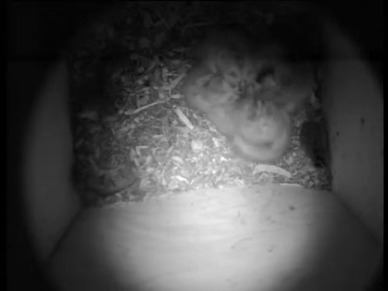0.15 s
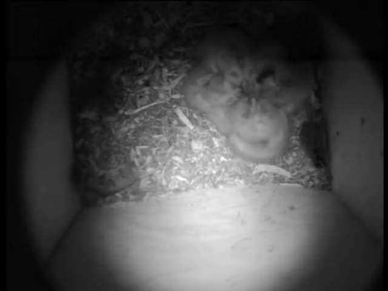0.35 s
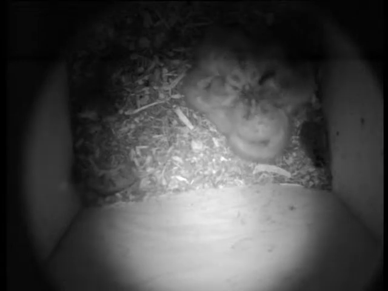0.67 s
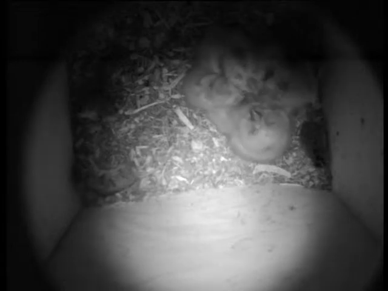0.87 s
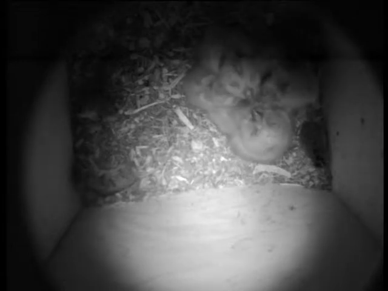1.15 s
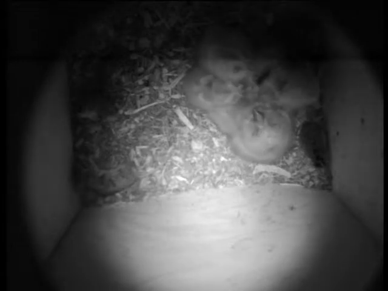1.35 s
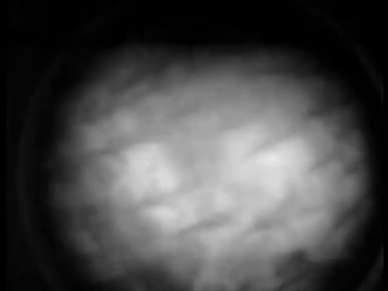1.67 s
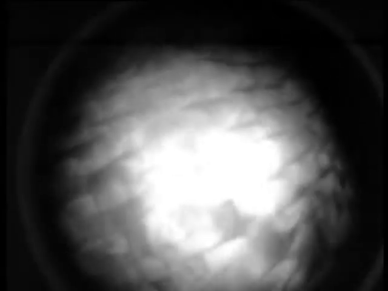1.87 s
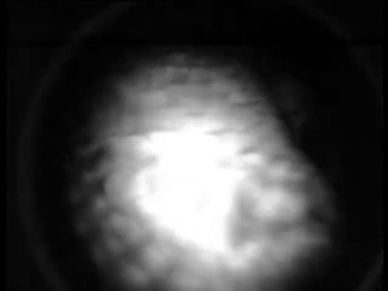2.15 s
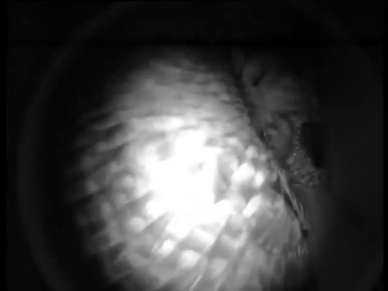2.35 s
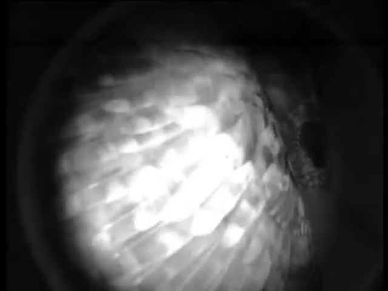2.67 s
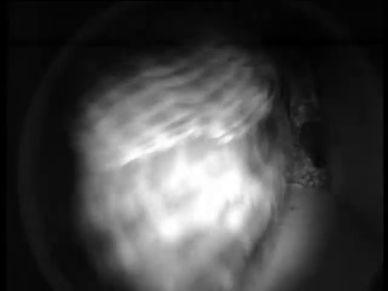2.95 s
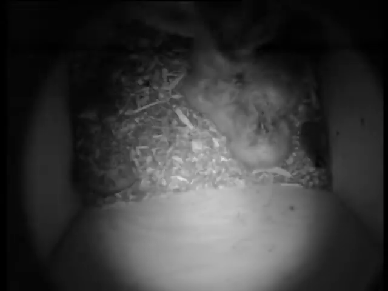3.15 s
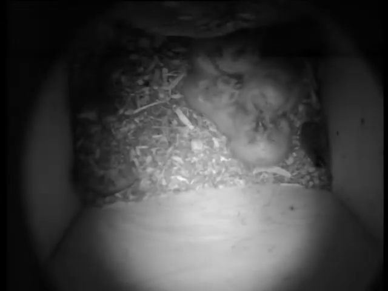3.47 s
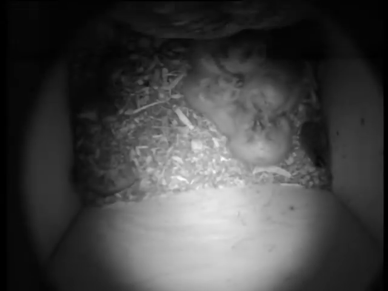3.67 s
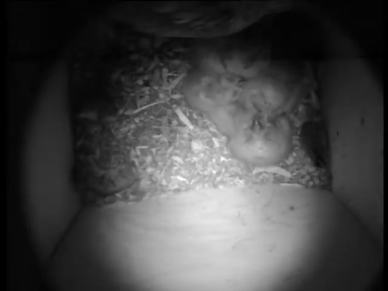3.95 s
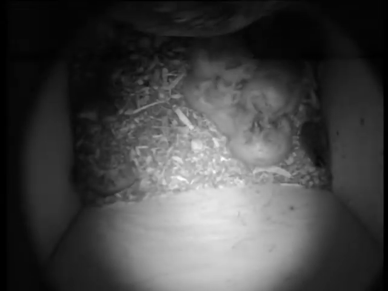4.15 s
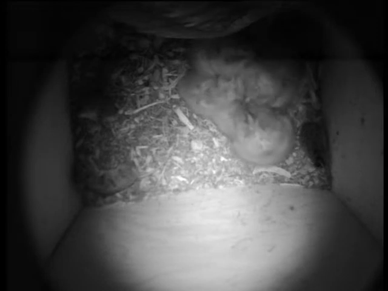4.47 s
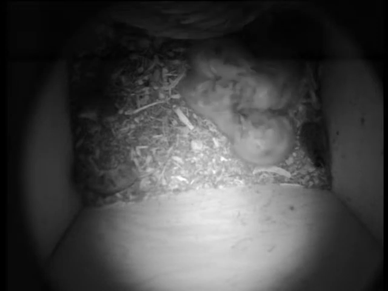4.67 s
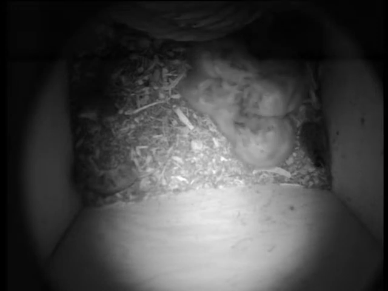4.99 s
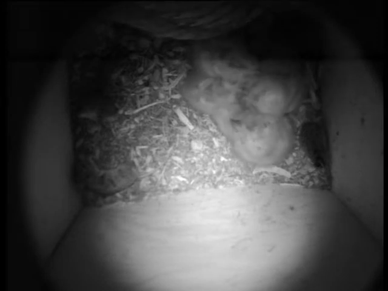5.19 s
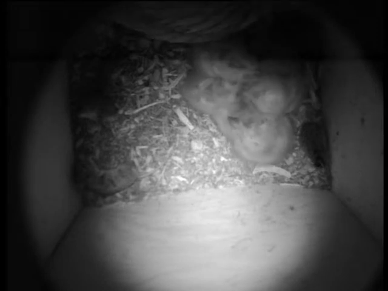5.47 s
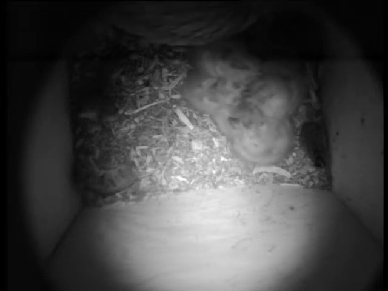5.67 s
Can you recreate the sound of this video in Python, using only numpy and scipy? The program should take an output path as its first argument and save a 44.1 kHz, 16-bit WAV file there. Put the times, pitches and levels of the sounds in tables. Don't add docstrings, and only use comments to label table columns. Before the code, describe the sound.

Close, boxy and left-sided: a low electrical buzz with a thin high whine runs throughout. Dull thumps lead to an owl chick's short hoarse hiss, then scattered claw knocks and scratches. A hard, clipped burst of banging follows, with ringing wood, low coos, another hiss and brushing feathers. It settles, broken by a final squeaky rasp and a soft thump.

```python
import sys
import numpy as np
from scipy import signal
from scipy.fft import rfft, irfft
from scipy.io import wavfile
from scipy.ndimage import uniform_filter1d

SR = 44100
rng = np.random.default_rng(int(sys.argv[2]) if len(sys.argv) > 2 else 0)


def dump_mix(stems):
    frames = np.atleast_2d(stems).T
    limited = np.clip(frames, -1, 1)
    pcm = np.round(limited * 32767).astype(np.int16)
    wavfile.write(sys.argv[1], SR, pcm)


def voltage_ratio(decibels):
    exponent = np.asarray(decibels, float) / 20
    return 10 ** exponent


N = 256662


def rms_one(x):
    return x / np.sqrt(np.mean(x ** 2) + 1e-20)


def in_time(rows):
    s, *columns = np.transpose(rows)
    return [np.interp(np.arange(N) / SR, s, column) for column in columns]


def sounding(tables, fade_s):
    t, gate = np.arange(N) / SR, 0
    for rows in tables:
        gate = np.maximum(gate, (t >= rows[0][0]) & (t <= rows[-1][0]))
    gate = uniform_filter1d(gate * 1., size=max(int(fade_s * SR), 1))
    return gate, *in_time(sum(map(list, tables), []))


def coloured(x, spectrum):
    hz, db = np.transpose(spectrum)
    f = np.arange(1, N // 2 + 2) * SR / N
    return rms_one(irfft(rfft(x) * voltage_ratio(np.interp(np.log(f), np.log(hz), db)), N))


def drift(hz):
    return rms_one(signal.sosfilt(signal.butter(2, hz, fs=SR, output="sos"), rng.standard_normal(N)))


def band(x, low_hz, high_hz):
    return signal.sosfilt(signal.butter(2, [low_hz, high_hz], "band", fs=SR, output="sos"), x)


def low(x, hz):
    return signal.sosfilt(signal.ellip(7, .3, 80, hz, fs=SR, output="sos"), x)


def grains(per_s, spread_db):
    sizes = voltage_ratio(spread_db * np.minimum(rng.exponential(1, N), 4)) * rng.choice([-1, 1], N)
    return sizes * (rng.random(N) < per_s / SR)


def ring(force, hz, t60):
    r, w = voltage_ratio(-60 / (t60 * SR)), 2 * np.pi * hz / SR
    return signal.lfilter([0, np.sin(w)], [1, -2 * r * np.cos(w), r * r], force + 1e-18)


def struck(times, level_db, contacts, modes, scatter_db):
    out, luck = 0, rng.standard_normal((len(times), len(modes)))
    steps = np.arange(contacts.shape[1])
    at = (np.array(times) * SR).astype(int)[:, None] + steps
    for (hz, db, t60), chance in zip(modes, luck.T):
        drive = np.maximum(np.abs(contacts @ np.exp(2j * np.pi * hz * steps / SR)), .25)
        gain = voltage_ratio(level_db + db + scatter_db * chance) / drive
        force = np.zeros(N)
        np.add.at(force, at, contacts * gain[:, None])
        out = ring(force, hz, t60) - out
    return out


def floor_echo(x):
    lag = int(1.363 * SR / 1000)
    return (x + voltage_ratio(-11) * np.roll(x, lag)) * voltage_ratio(-1)


def nest_box(x, more_db=0):
    out = x.copy()
    for ms, db in [(1.3, -36.0), (2.1, -13.0), (3.4, -15.0), (5.3, -24.5), (7.9, -7.0), (11.7, -17.0)]:
        lag = int(ms * SR / 1000)
        out[lag:] += voltage_ratio(db + more_db) * x[:-lag]
    return out


# (start [s], length [s], breath [dB], push [dB], peak of the push [share of call])
BEGGING = [
    (0.658, 0.27, -46.5, 3.5, 0.61),
    (2.352, 0.32, -53.5, 7, 0.65),
    (4.174, 0.31, -51.5, 11.5, 0.72),
]
# (brightness at ease [dB], brightness when pushing [dB])
BRIGHTNESS = [
    (10.5, 4.5),
    (9, 10.5),
    (4, -5.5),
]


def breath():
    attack_s, release_s, sag_db_per_s, push_width = 0.02, 0.049, -29.5, 0.24
    t, calls = np.arange(N) / SR, []
    for (s, length, db, push_db, push_at), (ease_db, pushed_db) in zip(BEGGING, BRIGHTNESS):
        edge = np.clip((t - s) / attack_s, 0, 1) * np.clip((s + length - t) / release_s, 0, 1)
        push = np.exp(-(((t - s) / length - push_at) / push_width) ** 2)
        pressure_db = db + push_db * push + sag_db_per_s * np.clip(t - s, 0, length)
        calls.append((edge * voltage_ratio(pressure_db), ease_db + (pushed_db - ease_db) * push))
    return calls


# (frequency [Hz], level per Hz [dB])
BREATH_SPECTRUM = [(240, -55), (400, -14), (829, -4.5), (1330, -3), (1500, 1.5), (2210, 0), (2570, 5),
                   (4800, 4.5), (7610, -2.5), (14000, -22.5)]
# (frequency [Hz], width [Hz], level [dB])
THROATS = [
    [(805, 520, 5.5), (1530, 44, -31), (1806, 44, 8), (2490, 250, 1.5), (2800, 230, -10.5), (3130, 150, 5),
     (4450, 290, -8), (4950, 270, -17), (5880, 79, -2.5), (6500, 100, -7), (7600, 100, -9), (8100, 70, -11),
     (9900, 150, 0.5), (11380, 110, 5)],
    [(900, 320, 3.5), (1930, 72, 2.5), (2700, 200, -24), (3670, 82, -4), (4480, 260, -7), (5160, 80, -8),
     (5800, 190, -4.5), (6570, 140, -6), (7460, 130, -4), (7700, 70, -1), (8590, 73, -6), (9100, 120, -4),
     (10300, 79, -23)],
    [(837, 420, 4.5), (1480, 54, -4), (1740, 37, 4.5), (2650, 92, -6), (3230, 87, -2.5), (3770, 210, -17),
     (4520, 130, -7), (5170, 140, -3), (6000, 82, 0), (6500, 110, -6), (6550, 70, -5), (7500, 120, 5.5),
     (8100, 106, -1), (8700, 150, -7)],
]


def hiss():
    air = coloured(rng.standard_normal(N), BREATH_SPECTRUM) * voltage_ratio(3 * drift(250))
    out = 0
    for (gain, bright_db), throat in zip(breath(), THROATS):
        voiced = voltage_ratio(-11.5) * air
        for hz, width, peak_db in throat:
            resonance = signal.iirpeak(hz, hz / max(width, 20), fs=SR)
            voiced = voiced + voltage_ratio(peak_db + 0.5) * signal.lfilter(*resonance, air)
        voiced = voiced / np.std(band(voiced, 1040, 2720))
        out = out + gain * (voiced + (voltage_ratio(bright_db) - 1) * band(voiced, 6330, 20000))
    return out


def syrinx(tables, hoarseness, octave_db, flutter_hz):
    rows_with_noise = [[(*row, share) for row in rows] for rows, share in zip(tables, hoarseness)]
    gate, hz, db, hoarse = sounding(rows_with_noise, 0.0031)
    hoarse = np.clip(hoarse + 0.012 * np.maximum(-38 - db, 0), 0, 1)
    noise = drift(flutter_hz) + 1j * drift(flutter_hz)
    swing = np.sqrt(1 - hoarse) + np.sqrt(hoarse / 2) * noise
    tone = swing * np.exp(2j * np.pi * np.cumsum(uniform_filter1d(hz, size=400)) / SR)
    db = uniform_filter1d(db, size=150)
    octave = voltage_ratio(octave_db + db / 2) * (1 - hoarse) ** 4 * (tone ** 2).real * (hz < 7300)
    return gate * np.sqrt(2) * (voltage_ratio(db) * tone.real + octave)


def notes(rows):
    return [[(s, hz0, db - 6), (s + length / 2, (hz0 + hz1) / 2, db), (s + length, hz1, db - 6)]
            for s, length, hz0, hz1, db in rows]


# (time [s], frequency [Hz], level [dB])
HIGH_SQUEAKS = [
    [(0.66, 7000, -46.5), (0.685, 6900, -47), (0.73, 8030, -55), (0.76, 7000, -52), (0.805, 6900, -45),
     (0.815, 6630, -40), (0.834, 6180, -36), (0.863, 6550, -41.5), (0.885, 6740, -73)],
    [(2.365, 6300, -39), (2.39, 7740, -73), (2.515, 7650, -57), (2.535, 7330, -31), (2.556, 6880, -39),
     (2.588, 6220, -27.5), (2.6, 5450, -39.5), (2.612, 3790, -32), (2.622, 3580, -56)],
    [(4.178, 4060, -51.5), (4.19, 6820, -39), (4.212, 8100, -65), (4.305, 8000, -55), (4.34, 7350, -40),
     (4.374, 5700, -32.5), (4.408, 7240, -36), (4.433, 7500, -38), (4.461, 3660, -46.5)],
]
HIGH_HOARSE = [.08, .2, .45]
# (start [s], length [s], from [Hz], to [Hz], level [dB])
LOW_SQUEAKS = [
    (0.652, 0.0089, 4730, 4880, -41),
    (0.661, 0.018, 4820, 5130, -46),
    (0.79, 0.083, 4520, 4270, -47),
    (0.855, 0.041, 4320, 4586, -41),
    (0.89, 0.013, 4480, 4050, -34.5),
    (2.51, 0.0754, 4750, 4450, -43),
    (2.58, 0.024, 4450, 4480, -37.5),
]
LOW_HOARSE = [.3, .1, .4, .05, .02, .6, .5]


def squeaks():
    return syrinx(HIGH_SQUEAKS, HIGH_HOARSE, -40, 390) + syrinx(notes(LOW_SQUEAKS), LOW_HOARSE, -40, 390)


# (time [s], peak [dB], hollow ring [dB], bright crack [dB], dull crack [dB])
TAPS = [(0.9496, -43.5, -5, 1, 7), (0.971, -48, -2, 8, -15), (1.114, -31, -5, 0, -1),
        (1.1725, -36.5, 2, 4, -2.5), (1.3599, -36.5, -1, -5, 2.5), (1.4158, -26.5, -12, -7, -8),
        (1.4581, -29, 1, -5, 0), (1.4737, -35.5, 5, -14, 9), (1.6563, -16.5, -17, 0, 5),
        (1.6594, -20, 15.5, 6.5, 10.5), (1.676, -25, 7, -6, -16.5), (1.6869, -28, 13, 0, 3.5),
        (1.697, -27.5, 9, -5, 1.5), (1.709, -22, 10.5, -9, 0), (1.7201, -10, 1, -13.5, -9.5),
        (1.7346, -42.5, 9, -3, 15.5), (1.7514, -21.5, 5.5, -11, -22), (1.7793, -31.5, -11, -12, -12),
        (1.7988, -34, 3, -17, -8), (1.8042, -12, -8, -7, -15), (1.8662, -36.5, -3, -24, 7.5),
        (1.9, -41, -11, -4, 3), (1.9684, -23, -11, -24, -2), (1.996, -26.5, -13, -8, 2.5),
        (2.0082, -21.5, -4, -14, -0.5), (2.042, -27, -5, -20, -4.5), (2.047, -32, -3, -2, 0),
        (2.0572, -28.5, -22, 1.5, 1), (2.0793, -26, -3, -12.5, 5), (2.3268, -24, -15, -3, -8)]
# (time [s], peak [dB], hollow ring [dB], bright crack [dB])
SKIDS = [(0.936, -43, -21, -21), (1.1408, -45, 12.5, -19), (1.1577, -33, -4, -12), (1.2343, -41.5, -3, -21),
         (1.255, -51, -10, 6), (1.3078, -33.5, -8, -7), (1.377, -37, 2.5, -2), (1.4367, -20, -10, 3),
         (1.445, -17, -17, -18), (1.4855, -31, -11, -8), (1.4914, -57, -5, 16), (1.642, -15.5, -10, -2.5),
         (1.6513, -11.5, -2, -5.5), (1.6688, -9, -2, -1), (2.0326, -21.5, -23, -7), (2.0665, -47, -10, 11),
         (2.095, -38, -9, 10.5), (2.104, -22, -23, -2), (2.1138, -17, -11, -8), (2.118, -15.5, -16, -0.5),
         (2.125, -28.5, -5, -24), (2.164, -16.5, -11, 3.5), (2.169, -21.5, -7, -5), (2.193, -27.5, -5, -5),
         (2.3404, -29.5, -14, 7), (2.621, -53, 11, -5), (2.6447, -41.5, -3, 2), (2.6543, -41, -1, -4),
         (2.678, -50.5, 11, 4), (2.696, -51, -7, 16), (2.741, -55.5, -23, 17), (3.274, -60.5, 11.5, -10)]
# (frequency [Hz], level [dB], t60 [s])
NEAR_HOLLOW = [(610, -22, .03), (700, -18, .035), (860, -17, .035), (985, 0, .045), (1040, -17, .03),
               (1180, -15, .03), (1300, -16, .025), (1450, -18, .025)]
# (frequency [Hz], level [dB], t60 [s])
FAR_HOLLOW = [(600, -1, 0.016), (707, 2, 0.023), (840, -2.5, 0.022), (1015, -3, 0.034),
              (1170, -11.5, 0.034), (1366, -7, 0.017)]
# (frequency [Hz], level [dB], t60 [s])
WALL = [(1870, -17, .035), (2300, -18, .03), (2540, -21, .03), (2870, -16, .02), (3090, -14, .025),
        (3200, -1.5, .04), (3350, -17, .02), (3880, -15, .02), (4040, -13, .02), (4500, -19, .02)]
# (frequency [Hz], level [dB], t60 [s])
GRAIN = [(5500, -3.5, 0.026), (5774, -5.5, 0.012), (6500, 3.5, 0.0035), (7700, -4, .01),
         (8620, -1.5, 0.0081), (9800, -21, 0.012)]


def claws():
    s, db, hollow_db, bright_db, dull_db = np.transpose(TAPS + [(*row, 0) for row in SKIDS])
    tapped = np.arange(len(s)) < len(TAPS)
    over_microphone = (s >= 1.6) & (s <= 1.96)
    ring_db = np.where(tapped, -0.5, -15) - 8 * ~over_microphone

    ms = np.where(tapped, 2.6, 4.0) * voltage_ratio(1.5 * rng.standard_normal(len(s)))
    length = np.clip(ms, .2, 9)[:, None] / 1000
    steps = np.arange(1500)
    t = steps / SR
    grate = rng.standard_normal((len(s), 1500)) * (1 - np.exp(-t / (0.69 * length))) * np.exp(-t / length)
    grate /= np.sqrt(np.sum(grate ** 2, axis=1, keepdims=True))

    at = (s * SR).astype(int)[:, None] + steps
    dull, bright = np.zeros((2, N))
    np.add.at(dull, at, grate * voltage_ratio(db + dull_db)[:, None])
    np.add.at(bright, at, grate * voltage_ratio(db + bright_db)[:, None])
    crack = voltage_ratio(22.0) * band(dull, 380, 3150) + voltage_ratio(10.5) * band(bright, 2400, 12500)

    tap = .4 * grate + .8 * (steps == 20)
    soft = uniform_filter1d(tap, size=16)
    near = tapped & (s > 1.6) & (s < 1.96)
    hollow = struck(s[near], (db + hollow_db)[near], soft[near], NEAR_HOLLOW, 1.5)
    hollow = hollow + struck(s[~near], (db + hollow_db)[~near], soft[~near], FAR_HOLLOW, 3.7)
    wall = struck(s, db + ring_db, tap, WALL, 2)
    wall = wall + struck(s, db + bright_db + ring_db - 2, grate, GRAIN, 3)
    return band(hollow, 360, 2700) + band(wall, 1130, 11000) + nest_box(crack)


# (time [s], frequency [Hz], level [dB])
SNAPS = [(0.973, 3020, -35), (0.974, 6500, -46), (1.115, 7600, -38), (1.116, 6060, -31), (1.115, 2957, -35),
         (1.117, 9900, -48), (1.174, 5440, -25.5), (1.175, 9900, -44.5), (1.177, 3670, -36.5),
         (1.235, 2800, -43), (1.309, 4600, -30), (1.309, 9220, -44), (1.361, 3000, -36), (1.378, 2900, -44),
         (1.361, 6180, -38), (1.416, 5870, -30), (1.416, 3350, -39), (1.416, 7780, -42), (1.446, 5800, -26),
         (1.458, 9140, -37), (1.474, 2640, -31), (1.804, 9200, -31), (1.999, 6000, -43),
         (2.047, 7700, -38.5), (2.057, 6100, -35), (1.447, 2740, -22.5), (1.67, 5890, -32),
         (2.096, 8120, -32), (2.104, 8120, -26), (2.121, 4550, -29), (2.165, 4610, -26),
         (2.166, 7700, -28.5)]


def snaps():
    out, t60, pair = 0, 0.016, 1.07
    for s, hz, db in SNAPS:
        grit = rng.standard_normal((1, 400)) * np.exp(-np.arange(400) / (0.003 * SR)) / 6
        modes = [(hz, 0, t60), (hz * pair, -2, t60 / 2), (hz / pair ** 2, -5, t60 / 2)]
        out = out + struck([s], np.array([db]), grit, modes, 0)
    return out


# (time [s], peak [dB], panel over boom [dB])
THUDS = [(0.108, -22, -23), (0.169, -29, -33), (0.544, -24.5, -42), (0.818, -11, -27.5), (1.097, -21, -32),
         (1.171, -13, -32), (1.44, -14, -11.5), (1.473, -15.5, -15.5), (1.64, -7, -12.5), (1.966, -38, 15),
         (1.984, -34, 10.5), (2.01, -25.5, 3.5), (2.059, -22, -15), (2.113, -6.5, -21), (2.164, -11, -13),
         (2.325, -20, -3.5), (2.345, -23.5, -1.5), (2.362, -29, -5), (3.082, -43, 3), (3.26, -35.5, -6.5),
         (4.464, -23, -31.5)]
# (frequency [Hz], level [dB], t60 [s])
BOOM = [(76.6, -16.5, 0.42), (100, -2, 0.1)]
# (frequency [Hz], level [dB], t60 [s])
PANEL = [(185, -17, 0.14), (273, -9, 0.19), (303, -7.5, 0.091), (319.7, -7, 0.19), (442, -17.5, 0.13)]


def thuds():
    s, db, panel_db = np.transpose(THUDS)
    push = np.hanning(70)[None] / 35 * np.ones((len(s), 1))
    boom = struck(s + 0.0015, db - 11.5, push, BOOM, 1.0)
    return boom + struck(s + 0.0035, db + panel_db, push, PANEL, 3.2)


# (time [s], frequency [Hz], level [dB], t60 [s])
KNOCKS = [(0.0505, 99.6, -13, 0.088), (0.0515, 269.6, -23, 0.14), (0.051, 337, -28.5, 0.11),
          (0.053, 80, -34, 0.45), (1.649, 324, -13, 0.026), (1.651, 520, -9, 0.017),
          (1.808, 3230, -18.5, 0.047), (2.022, 3130, -36, .03), (2.05, 3210, -28, .04),
          (2.058, 3120, -31, .03), (2.066, 110, -24, .08), (2.108, 3200, -42, .03), (2.113, 3270, -32, .02),
          (2.123, 100, -22, 0.083), (2.151, 3180, -35, 0.022), (2.172, 3190, -26, 0.042),
          (2.195, 3200, -42, .03), (1.487, 60, -26.5, .1), (3.385, 90, -50, .08), (2.614, 331, -39.5, 0.21),
          (2.644, 325, -33, 0.058), (2.65, 325, -48, 0.029), (2.654, 600, -34.5, 0.039),
          (2.654, 330, -35.5, 0.12), (2.692, 900, -40, 0.047), (2.74, 312, -48, .08),
          (2.783, 319, -35.5, 0.034), (2.868, 320, -40, 0.058), (2.912, 320, -41, .05),
          (2.975, 320, -45.5, 0.07)]


def knocks():
    out = 0
    for s, hz, db, t60 in KNOCKS:
        push = np.hanning(3 + int(SR / hz / 3))[None]
        out = out + struck([s], np.array([db]), push, [(hz, 0, t60)], 0)
    return out


# (time [s], weight on the box [dB], grip of the claws [dB])
CLAMBER = [(0.85, -26, -67), (0.944, -37, -39), (1.034, -36, -50), (1.158, -21, -39), (1.272, -24, -48),
           (1.58, -27, -41.5), (1.62, -16.5, -33.5), (1.716, -19.5, -23), (1.834, -21.5, -38.5),
           (1.956, -23, -35), (2.116, -8.5, -27.5), (2.212, -15.5, -37.5), (2.4, -28.5, -45.5),
           (2.616, -36, -47.5), (2.81, -28, -51.5), (2.956, -36, -48), (3.1, -61, -65), (3.7, -58, -59.5)]
# (time [s], level [dB], spread [s])
BRUSHES = [(1.16, -57.5, 0.066), (1.42, -59.5, 0.15), (1.59, -56.5, 0.078), (1.83, -54, 0.056),
           (2.12, -50.5, 0.16), (2.338, -45, 0.057), (2.481, -54, 0.045), (2.8, -60, 0.095),
           (2.935, -50.5, 0.053), (3.1, -64, 0.034), (3.45, -65.5, 0.11), (3.57, -68, 0.03),
           (4.65, -66, 0.04), (4.97, -67, 0.04)]
# (frequency [Hz], level [dB], t60 [s])
SCRAPED = [(554, -21, 0.028), (679.4, 9, 0.047), (862, 6.5, 0.04), (846, 5, 0.059), (1040, 4, 0.11),
           (1240, 1.5, 0.039), (1430, -4.5, 0.027)]
# (frequency [Hz], level per Hz [dB])
FEATHER = [(880, -59), (1500, -4.5), (2500, -4), (3150, 2), (4100, -7.5), (5100, -4.5), (10300, -7),
           (14500, -11.5)]


def driven(force, modes):
    return rms_one(sum(voltage_ratio(db) * ring(force, hz, t60) for hz, db, t60 in modes))


def clamber():
    gate, push_db, scratch_db = sounding([CLAMBER], 0.02)
    t = np.arange(N) / SR
    brushing = sum(voltage_ratio(db) * np.exp(-((t - s) / spread) ** 2) for s, db, spread in BRUSHES)
    pushes, scratches = grains(250, 4.5), grains(1500, 3.0)
    push = driven(pushes, BOOM) + voltage_ratio(-3.0) * driven(pushes, PANEL)
    scratch = driven(scratches, SCRAPED) + voltage_ratio(-21.0) * driven(scratches, WALL)
    scratch = scratch + voltage_ratio(-9.0) * rms_one(band(scratches, 380, 2670))
    rustle = coloured(grains(5800, 0.88), FEATHER) * voltage_ratio(2.0 * drift(40))
    return gate * (voltage_ratio(push_db - 22.5) * push + voltage_ratio(scratch_db - 7.0) * scratch + brushing * rustle)


def jolt():
    decay_s, rebound_s = 0.00061, 0.0036
    t = np.arange(N) / SR - 1.6412
    after = np.maximum(t, 0)
    rebound = voltage_ratio(-5) * np.sin(t / rebound_s) * np.exp(-after / rebound_s)
    step = voltage_ratio(-1.5) * (t > 0) * (np.exp(-after / decay_s) - rebound)
    return signal.lfilter([.3], [1, -.7], step)


# (start [s], length [s], from [Hz], to [Hz], level [dB])
COOS = [
    (2.12, 0.033, 960, 900, -27),
    (2.2, 0.0633, 918, 1008, -40),
    (2.25, 0.097, 989, 1009, -49),
    (2.43, 0.12, 961, 1007, -43),
    (2.55, 0.071, 961, 1026, -50),
    (2.79, 0.064, 1075, 1042, -46),
]
COO_HOARSE = [.35, .3, .3, .35, .4, .05]


def coos():
    return syrinx(notes(COOS), COO_HOARSE, -55, 58.0)


# (time [s], field buzz [dB], extra field hum [dB])
PICTURE = [(0.0, -52, -12), (0.1, -53, -4), (0.24, -55.5, -23), (0.33, -53, -8), (0.55, -53, -11),
           (0.8, -53.5, -20), (0.95, -56, -12), (1.1, -53, -22), (1.6, -50, -1), (2.3, -52, -12),
           (2.5, -53.5, 1), (2.98, -51.5, -8), (3.15, -53.5, -24), (5.82, -54, -26)]


def picture():
    buzz_db, hum_db = in_time(PICTURE)
    field_hz, line_hz = 50, 15625
    start, end, tick = 15.45, 17.1, .36
    t = np.arange(N) / SR
    ms = t % (1 / field_hz) * 1000
    since = (ms - end) % 20
    sag = 23.6 * (1 - np.exp(-since / 2.3)) - 1.2 * since
    sync = np.where(ms < start + tick, 8, -2.5 + 4 * np.exp(-((ms - end + .3) / .3) ** 2))
    buzz = sag + sync * ((ms > start) & (ms < end)) - 6.5 * np.exp(-since / .25)
    buzz = 1.15 * rms_one(band(buzz, 2, 7000))
    shading = .75 + .46 * np.clip((since - 1) / 13, 0, 1) * (since < 18.4)
    shading = uniform_filter1d(shading, size=60)
    whine = voltage_ratio(-44) * np.sqrt(2) * shading * np.sin(2 * np.pi * line_hz * t)
    return voltage_ratio(buzz_db) * (buzz + voltage_ratio(hum_db) * band(buzz, 38, 66)), whine


# (frequency [Hz], level per Hz [dB])
FLOOR = [(71, -27), (120, -1.5), (155, -2.5), (172, -3), (190, -9), (222, -7), (241, 0), (277, -6),
         (338, 2), (421, -7), (915, -7.5), (1990, -16), (3990, -21), (11200, -29), (14000, -28.5)]


def noise_floor():
    return voltage_ratio(-58) * coloured(rng.standard_normal(N), FLOOR) * voltage_ratio(0.34 * drift(23.8))


def idle_input(buzz):
    return low(voltage_ratio(-77) * rng.standard_normal(N) - voltage_ratio(-28.5) * buzz, 14500)


def scene():
    chicks = voltage_ratio(4.5) * nest_box(floor_echo(hiss() + squeaks()), -7)
    parent = claws() + snaps() + thuds() + knocks() + clamber() + coos() + jolt()
    buzz, whine = picture()
    left = 2 * (chicks + parent + noise_floor() + buzz + whine)
    return np.array([left, idle_input(buzz)])


def top_cut(x):
    return signal.sosfilt(signal.butter(12, 16500, fs=SR, output="sos"), x)


def record(dry):
    left = np.clip(dry[0], -1, 1)
    square = band(left, 260, 13000) ** 2
    rectified = voltage_ratio(-22.5) * low(band(square, 3.9, 2100), 190)
    splatter = voltage_ratio(-33) * band(square, 150, 3970)
    right = dry[1] + rectified + splatter
    mix = low(np.array([left, right]), 16200)
    return top_cut(mix)


dry = scene()
out = record(dry)
dump_mix(out)
```